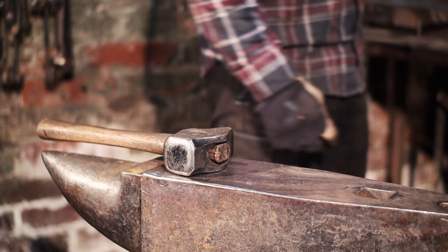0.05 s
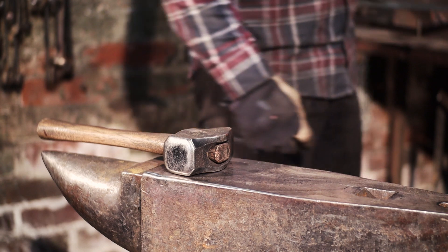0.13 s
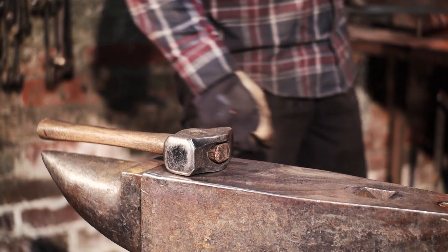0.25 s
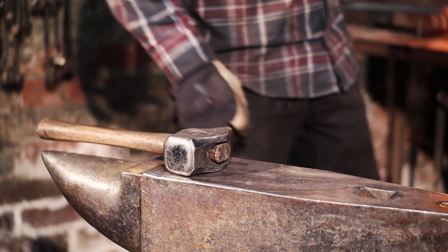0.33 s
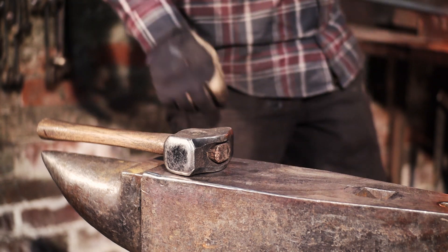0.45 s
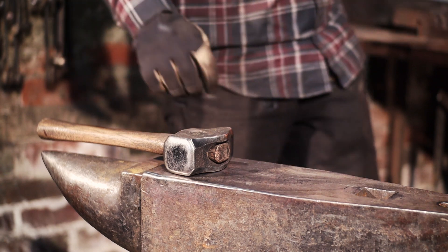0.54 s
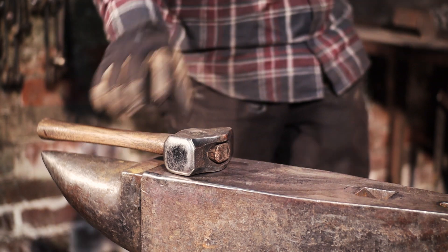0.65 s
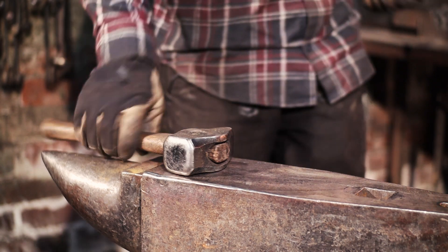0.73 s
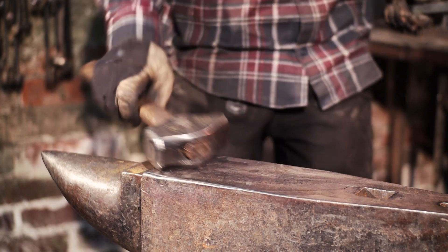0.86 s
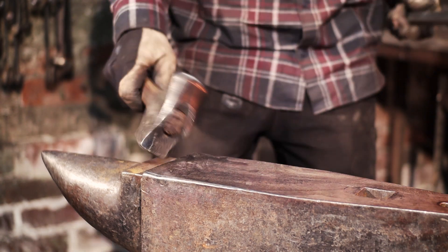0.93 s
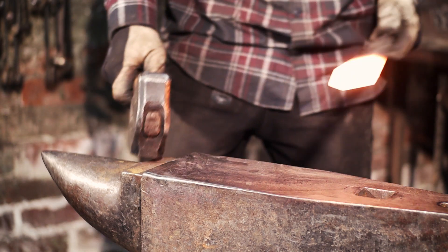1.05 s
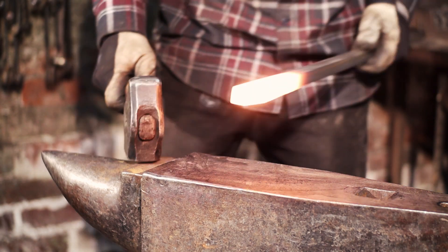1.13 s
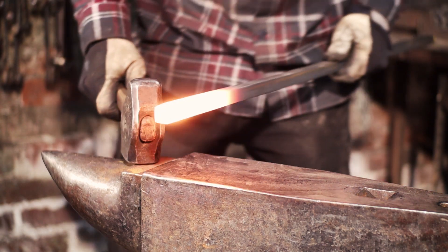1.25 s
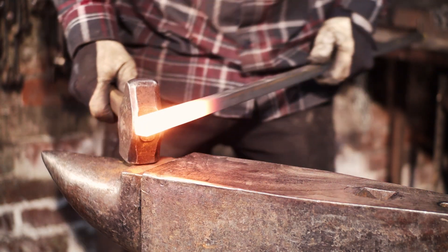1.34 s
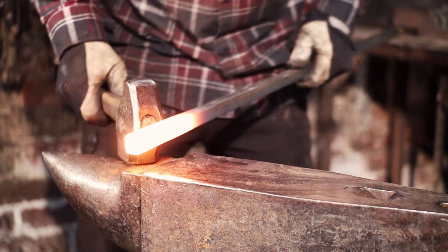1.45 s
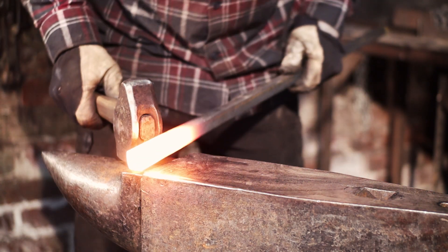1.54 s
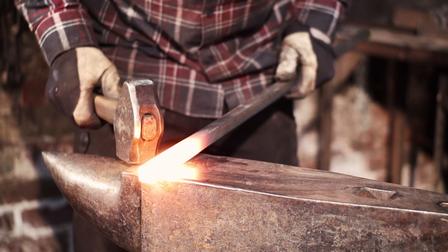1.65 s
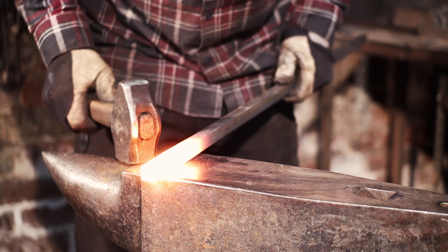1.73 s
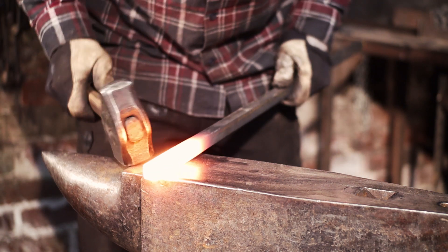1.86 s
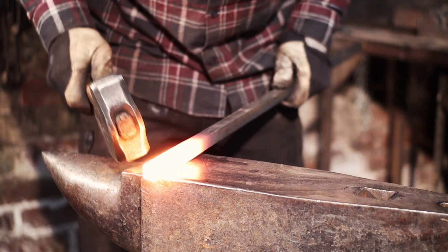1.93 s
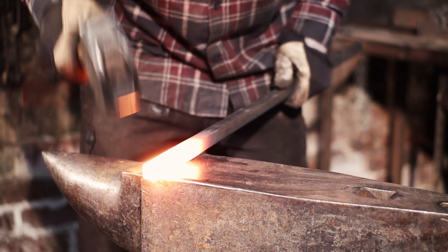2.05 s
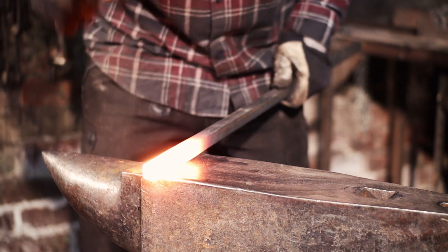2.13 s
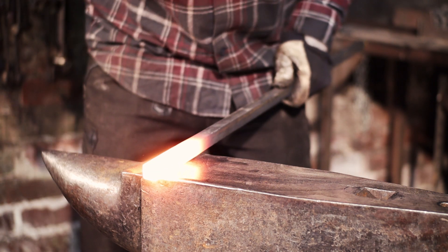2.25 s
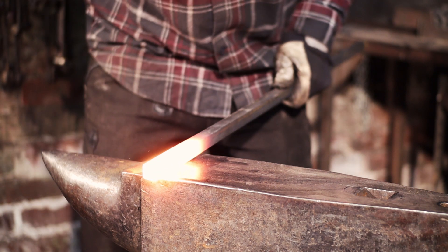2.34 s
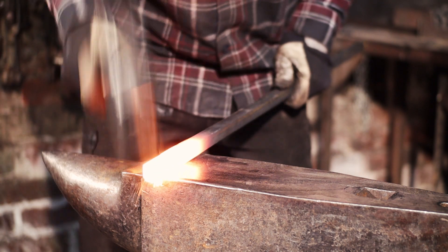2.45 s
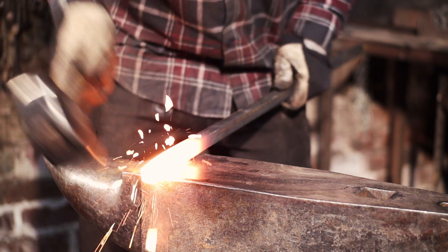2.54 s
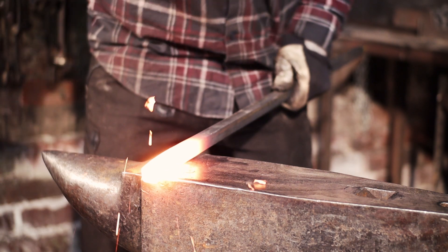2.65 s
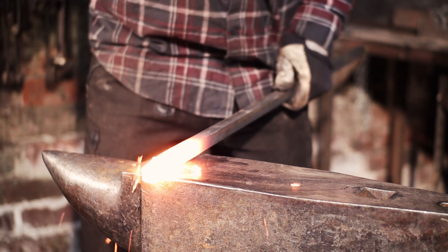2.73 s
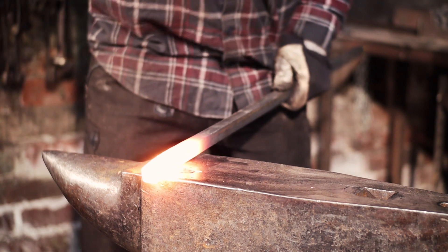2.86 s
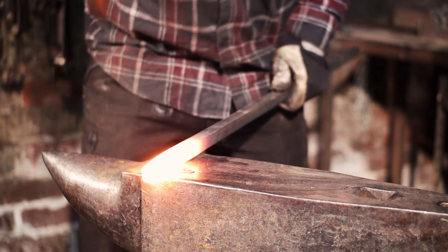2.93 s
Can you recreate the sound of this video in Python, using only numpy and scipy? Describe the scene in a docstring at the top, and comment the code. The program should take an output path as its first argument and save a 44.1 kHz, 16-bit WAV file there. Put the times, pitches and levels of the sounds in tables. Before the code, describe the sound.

One hammer blow on a hot steel bar at 2.6 s: a thud, hard crack, short high anvil ring and deep floor boom. Earlier, an iron tool clanks loudly at 0.18 s with a quick echo, a glove rubs at 0.75, light taps sound at 0.9-1.0 and 1.22-1.34, and a bar grates at 1.55-1.73. Scale flakes tick from 2.84. Low blower hum throughout; close microphone, brick room tail.

```python
"""A blower hums in a brick forge while, close to the microphone, an iron tool clanks down.
A gloved hand shifts the hammer off the anvil and onto its face, a hot bar slides along the anvil,
then the hammer lands on the soft steel and flakes of scale drop off.
Metal and wood ring as decaying sines, cracks and rubbing are coloured noise, and the blower is air noise
with wavering tones; a diffuse noise tail makes the room, and slow low modes make the floor boom."""
import sys
import numpy as np
from scipy import signal
from scipy.fft import rfft, irfft
from scipy.io import wavfile

SR = 44100
rng = np.random.default_rng(int(sys.argv[2]) if len(sys.argv) > 2 else 0)


def wav_out(sig):
    """Save sig, one row per channel (or a flat mono array), as 16-bit PCM at SR to the path in sys.argv[1]."""
    wavfile.write(sys.argv[1], SR, np.round(np.clip(np.atleast_2d(sig).T, -1, 1) * 32767).astype(np.int16))


def volts_from_decibels(level):
    """Turn decibel levels (scalar or array-like) into linear amplitude factors."""
    exponent = np.asarray(level, float) / 20
    return 10 ** exponent


N = 134505  # length in samples, about 3 s


def rms_one(x):
    """Scales a signal to rms 1."""
    return x / np.sqrt(np.mean(x ** 2) + 1e-20)


def at_hz(points, hz):
    """Reads a curve of (pitch, value) points along log frequency."""
    point_hz, values = np.transpose(points)
    return np.interp(np.log(hz), np.log(point_hz), values)


def level(rows):
    """Gain along a curve of (time [s], level [dB]), silent outside it."""
    s, db = np.transpose(rows)
    return volts_from_decibels(np.interp(np.arange(N) / SR, s, db, left=-200, right=-200))


def drift(rate_hz):
    """Slow chance of spread 1: noise through two equal low-pass poles, made at every 40th sample."""
    r = np.exp(-2 * np.pi * rate_hz * 40 / SR)
    noise = rng.standard_normal(N // 40 + 2002)
    slow = signal.lfilter([1], [1, -2 * r, r * r], noise)[2000:]  # skips the filter's start
    return np.interp(np.arange(N) / 40, np.arange(len(slow)), rms_one(slow))


def clicks(s, gains):
    """Impulses at the given times."""
    samples = (np.asarray(s) * SR).astype(int)
    return np.bincount(samples, gains * np.ones(len(s)), N)[:N] + 1e-18


def ring(x, hz, t60):
    """A unit click sets a sine of height about 1 ringing; it swells over a few cycles, then dies."""
    rise_cycles = 1.8
    w = 2 * np.pi * hz / SR
    q = np.exp(-2 * np.pi * hz / (rise_cycles * SR))
    swell = signal.lfilter((1 - q * q) / 2 * np.array([1, 0, -1]), [1, -2 * q * np.cos(w), q * q], x)
    r = volts_from_decibels(-60 / (t60 * SR))
    return signal.lfilter([0, np.sin(w)], [1, -2 * r * np.cos(w), r * r], swell)


def coloured(x, spectrum):
    """Shapes a dense signal to a spectrum; rms 1."""
    hz = np.maximum(np.arange(N // 2 + 1) * SR / N, 1)
    return rms_one(irfft(rfft(x) * volts_from_decibels(at_hz(spectrum, hz)), N))


def struck(s, db, pitches, modes, spread_db):
    """Every given time sets off every mode with a strength and sign of its own."""
    chance = rng.standard_normal((len(s), len(modes), 2))
    out = 0
    for k, (hz, (mode_db, t60)) in enumerate(zip(pitches, modes)):
        strength = volts_from_decibels(db + mode_db + spread_db * chance[:, k, 0])
        sign = np.sign(chance[:, k, 1])
        out = out + ring(clicks(s, strength * sign), hz, t60)
    return out


def crack(s, db, spectrum, t60):
    """A short burst of noise at each given time, with a brief rise and an exponential decay."""
    rise_s = 0.00045
    decay = signal.lfilter([1], [1, -volts_from_decibels(-60 / (t60 * SR))], clicks(s, volts_from_decibels(db)))
    r = np.exp(-2 / (rise_s * SR))
    envelope = signal.lfilter([(1 - r) ** 2], [1, -2 * r, r * r], decay)
    return coloured(rng.standard_normal(N), spectrum) * envelope


def thump(s, db):
    """A soft push into the wooden stump and floor under the anvil: low modes, their top rounded off."""
    # stump modes: pitch [Hz]; then (level [dB], t60 [s])
    pitches = [120, 168, 195, 277, 380, 600]
    modes = [(-8, 0.1), (-4.5, 0.081), (-11, 0.059), (1, 0.096), (5, 0.029), (-6, 0.044)]
    soft = signal.butter(2, 890, fs=SR, output="sos")  # Hz
    return signal.sosfilt(soft, struck(s, db, pitches, modes, spread_db=1.0))


def blower():
    """Air noise whose level flickers a little, and motor tones wavering in level and phase."""
    # air noise: (pitch [Hz], relative level [dB])
    air_colour = [(20, -33), (45, 0.5), (70, 8), (100, -24), (122, -4), (220, 6), (320, 0), (800, -4.5),
                  (1500, -5.5), (1950, -17), (3200, -17), (5500, -21), (6300, -28), (9000, -37),
                  (15500, -44.5), (16500, -81)]
    # motor tones: (pitch [Hz], level before a 5 dB lift to sine height [dB])
    hum = [(101, -60), (222, -62), (301.5, -61), (602.9, -67), (802.1, -66), (11999, -97)]
    air_db, hum_waver_db = -49.5, 1
    out = coloured(rng.standard_normal(N), air_colour) * volts_from_decibels(air_db + 0.39 * drift(9))
    t = np.arange(N) / SR
    for hz, db in hum:
        height = volts_from_decibels(db + 5 + hum_waver_db * drift(27))
        phase = 2 * np.pi * (hz * t + rng.random()) + 1.86 * drift(3.2)
        out = out + height * np.sin(phase)
    return out


def forge(x):
    """Diffuse tail of the brick room: per band a noise that builds up, then dies at its own rate."""
    # decay: (pitch [Hz], t60 before it is held within 0.1 to 1.5 s [s])
    room_t60 = [(60, 2), (150, 0.9), (400, 1.23), (1000, 0.83), (2500, 0.69), (5000, 0.56), (9000, 0.5),
                (15000, -0.3)]
    # strength of the tail: (pitch [Hz], gain [dB])
    room_db = [(60, 8), (150, 9), (300, 1.5), (1000, 1.5), (2500, -2.5), (5000, -6.5), (9000, -5),
               (15000, -27)]
    rise_s, rise_cycles = 0.00081, 3.8  # the build-up takes their sum
    edges = 22 * 2 ** np.arange(0, 9.9, 1 / 3)  # third-octave bands, Hz
    t = np.arange(int(1.5 * SR)) / SR
    white = rng.standard_normal((2, len(t)))  # neighbouring bands take different noise
    tail = 0
    for k, (low, high) in enumerate(zip(edges, edges[1:])):
        hz = np.sqrt(low * high)
        t60 = np.clip(at_hz(room_t60, hz), 0.1, 1.5)
        build_up = 1 - np.exp(-(t / (rise_s + rise_cycles / hz)) ** 2)
        shape = volts_from_decibels(-60 * t / t60) * build_up
        band_pass = signal.butter(2, [low, high], "band", fs=SR, output="sos")
        band = signal.sosfilt(band_pass, white[k % 2])
        tail = tail + band * shape * volts_from_decibels(at_hz(room_db, hz)) / np.sqrt(np.sum(shape ** 2))
    return signal.fftconvolve(x, tail)[:N]


def floor_boom():
    """Deep floor and wall modes swell after the clank, the hammer's set-down and the blow, and waver."""
    # floor and wall modes: (pitch [Hz], level [dB], t60 [s])
    modes = [(69.3, 1.5, 1), (91.3, -1, 0.74)]
    # clank, set-down of the hammer, blow: (time [s], level [dB])
    hits = [(0.18, -43), (1.299, -45.5), (2.595, -25.5)]
    swell_s = 0.035
    out = 0
    for hz, mode_db, t60 in modes:
        for hit_s, hit_db in hits:
            t = np.maximum(np.arange(N) / SR - hit_s, 0)
            decay = volts_from_decibels(hit_db + mode_db - 60 * t / t60 + 2.8 * drift(14))
            swell = 1 - np.exp(-(t / swell_s) ** 2)
            phase = 2 * np.pi * (hz * t + rng.random()) + 0.71 * drift(12.0)
            out = out + decay * swell * np.sin(phase)
    return out


def glove():
    """Leather rubs on wood: coloured noise with a flickering level."""
    # strength of the rub before flicker and trim: (time [s], level [dB])
    curve = [(.74, -89), (.75, -53), (.775, -52), (.82, -59), (.84, -60), (.852, -54), (.875, -63),
             (.95, -68)]
    # (pitch [Hz], relative level [dB])
    colour = [(1500, -25), (3500, 2), (6000, -2), (10000, -14), (15000, -14), (16500, -23)]
    flicker = volts_from_decibels(0.77 * drift(49) - 8.5)
    return level(curve) * flicker * coloured(rng.standard_normal(N), colour)


def slide():
    """Grit under the sliding bar: a dense rain of random grains, coloured, with a flickering level."""
    # strength of the slide before flicker and trim: (time [s], level [dB])
    curve = [(1.54, -79), (1.548, -54), (1.575, -50), (1.592, -44), (1.65, -49.5), (1.683, -46),
             (1.70, -57), (1.74, -79)]
    # (pitch [Hz], relative level [dB])
    colour = [(400, -10), (870, -6), (1500, -8.5), (3300, -8.5), (5500, -7), (7000, -19.5), (11000, -22.5),
              (15000, -28), (16500, -47)]
    grains_per_s = 3400
    grains = (rng.random(N) < grains_per_s / SR) * rng.standard_normal(N)
    grit = grains * volts_from_decibels(1.1 * np.minimum(rng.exponential(1, N), 4))  # a few grains stand out
    flicker = volts_from_decibels(0.72 * drift(56) - 1.8)
    return level(curve) * flicker * coloured(grit, colour)


def flakes():
    """Flakes of scale land as tiny brittle ticks of noise."""
    # landings: (time [s], level [dB])
    landings = [(2.842, -59), (2.899, -59), (2.945, -61), (2.963, -62), (2.987, -61), (3.023, -58)]
    # (pitch [Hz], relative level [dB])
    colour = [(4000, -40), (7500, 3), (9000, -11), (11500, -2), (15000, -4), (16500, -30)]
    s, db = np.transpose(landings)
    return crack(s, db, colour, t60=0.008)


def touches():
    """Taps of hammer on cold anvil, too soft to ring it fully: (thumps, pings and ticks; crack)."""
    # taps: (time [s], crack level [dB], thump relative to it [dB], bright tick relative to it [dB])
    taps = [(0.902, -38, -18, -0.5), (0.969, -32, -17, -11.5), (0.981, -36, -9, -10),
            (0.995, -38.5, -10, -11), (1.222, -26, -23, -11.5), (1.23, -34, 4.5, -24),
            (1.2880, -27, -5.5, -4.5), (1.322, -32.5, -18, -3), (1.3420, -32.5, -1, -18)]
    # hammer head or bar sings: (time [s], pitch [Hz]); then (level [dB], t60 [s])
    pings = [(.903, 2400), (1.290, 5250), (.982, 12240), (1.291, 14700), (1.225, 5730), (1.250, 2562),
             (1.323, 2562), (1.572, 880), (1.760, 800)]
    ping_ring = [(-55, .25), (-48, .07), (-60, .3), (-72, .2), (-57, .25), (-52, .25), (-53, .5), (-44, .2),
                 (-48, .2)]
    # colours of crack and tick: (pitch [Hz], relative level [dB])
    crack_colour = [(150, -4.5), (700, 4), (2000, -3.5), (4500, -15.5), (6500, -24), (9000, -39),
                    (15000, -56), (16500, -60)]
    tick_colour = [(1500, -10), (2800, 8.5), (4800, 3), (6500, -27)]
    ping_waver_db = 4  # these faint rings come and go
    s, db, low_db, tick_db = np.transpose(taps)
    singing = 0
    for (ping_s, hz), (ping_db, t60) in zip(pings, ping_ring):
        waver = volts_from_decibels(ping_waver_db * drift(25))
        singing = singing + ring(clicks([ping_s], volts_from_decibels(ping_db)), hz, t60) * waver
    ticks = crack(s, db + tick_db, tick_colour, t60=0.021)
    return np.array([thump(s, db + low_db) + singing + ticks, crack(s, db, crack_colour, t60=0.033)])


def tool():
    """The iron tool clatters down and an echo follows, each with ringing modes and noise: (rings, crack)."""
    # contacts, then at 0.226 s an echo of the clank off the forge walls:
    # (time [s], crack level [dB], ring level [dB])
    clank = [(0.1753, -26.5, -23.5), (0.178, -12.5, -12.5), (0.182, -18.5, -26.5), (0.186, -16, -21),
             (0.189, -27.5, -64), (0.226, -17, -37.5)]
    # modes of the tool: pitch [Hz]; then (level [dB], t60 [s])
    pitches = [225, 370, 440, 740, 1337, 2150, 2805, 2900, 3695, 4570, 4856, 5378, 8382, 8865, 12690]
    modes = [(-24, 1), (-16, 0.25), (-0.5, 0.06), (-7.5, 0.076), (-12, 0.04), (-5.5, 0.04), (1, 0.09),
             (-3, 0.12), (-17, 0.25), (-8, 0.024), (-18, 0.15), (-20, 0.15), (-27, .15), (-25, 0.33),
             (-34, 0.22)]
    # (pitch [Hz], relative level [dB])
    crack_colour = [(100, -16), (220, 3), (430, 8), (1200, 3), (2800, -2.5), (5000, -1.5), (6500, -15),
                    (9700, -29.5), (10500, -33), (15000, -40), (16500, -76)]
    s, crack_db, ring_db = np.transpose(clank)
    rings = struck(s, ring_db, pitches, modes, spread_db=2.0)
    return np.array([rings, crack(s, crack_db, crack_colour, t60=0.016)])


def blow():
    """Thud through the soft steel first, then cracks; steel on steel rings the anvil: (rings, crack)."""
    # first touch, full squeeze, steel on steel, soft rebound:
    # (time [s], thud level [dB], crack level [dB])
    contacts = [(2.5952, -19, -24), (2.5974, -15, -19.5), (2.6001, -53, -12.5), (2.605, -18, -17.5)]
    # modes of anvil and hammer head: pitch [Hz]; then (level [dB], t60 [s])
    pitches = [1007, 1150, 2417, 2837, 3472, 4727, 5206, 5367, 5717, 9738, 11220, 14340, 15410]
    modes = [(-11, .2), (-12, .04), (-15, .09), (-12, .03), (-12, .07), (-10, .04), (2, .17), (-8, .1),
             (-14, .08), (-20, .1), (-18, .07), (-23, .16), (-26, .11)]
    # (pitch [Hz], relative level [dB])
    crack_colour = [(120, -4.5), (400, -6.5), (900, -6.5), (2000, -4.5), (3400, -6), (5200, -4),
                    (7000, -18.5), (10500, -13), (13000, -17), (16500, -25)]
    ring_s, ring_db = 2.6012, -25
    s, thud_db, crack_db = np.transpose(contacts)
    rings = struck([ring_s], ring_db, pitches, modes, spread_db=4.0)
    return np.array([thump(s, thud_db) + rings, crack(s, crack_db, crack_colour, t60=0.018)])


def scene():
    """Sums the direct sounds, the room's answer to them, the floor and the blower, in one channel."""
    rings, cracks = tool() + blow() + touches()
    noises = cracks + glove() + slide() + flakes()
    ring_to_room_db = -7  # rings reach the walls weaker than cracks
    room = forge(noises + volts_from_decibels(ring_to_room_db) * rings)
    return (rings + noises + room + floor_boom() + blower())[None]


def band_limit(x):
    """A steep low-pass at the top of the band."""
    return signal.sosfilt(signal.butter(12, 16460, fs=SR, output="sos"), x)


def record(dry):
    """The microphone drops the deep bass and the top of the treble."""
    low_cut = signal.butter(2, 68, "high", fs=SR, output="sos")  # Hz
    top_cut = signal.cheby2(12, 60, 16400, fs=SR, output="sos")  # 60 dB down from 16400 Hz
    x = signal.sosfilt(low_cut, dry)
    x = signal.sosfilt(top_cut, x)
    return band_limit(x)


dry = scene()
out = record(dry)
wav_out(out)
```